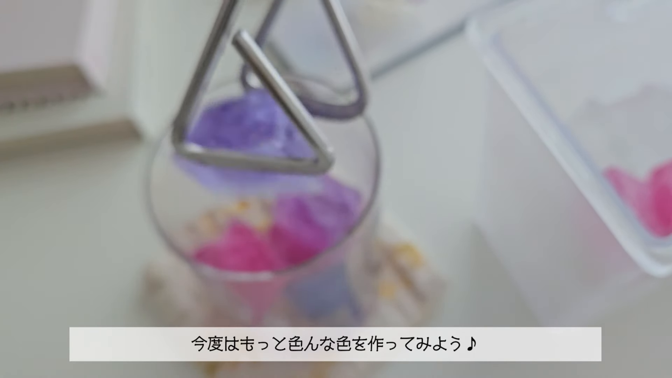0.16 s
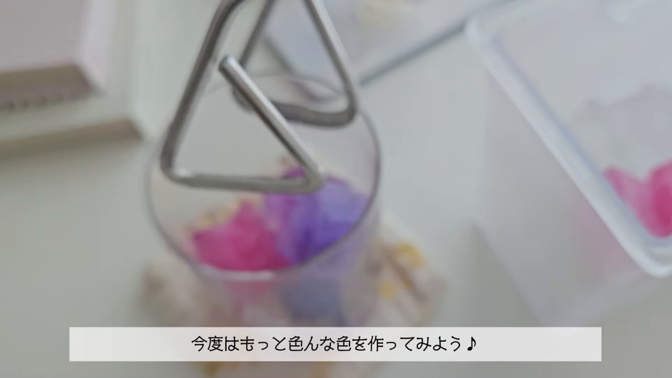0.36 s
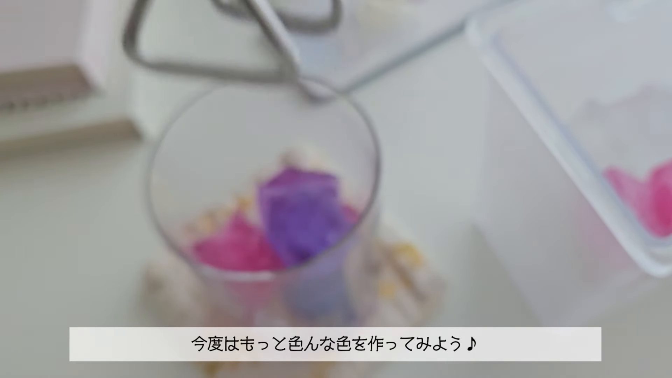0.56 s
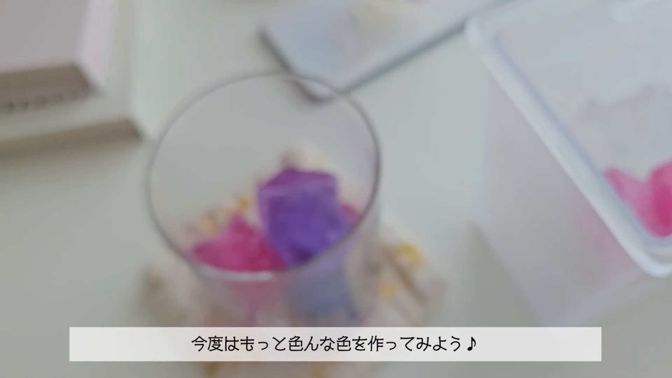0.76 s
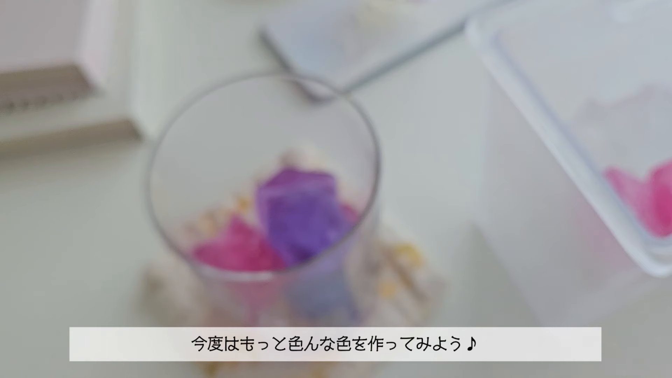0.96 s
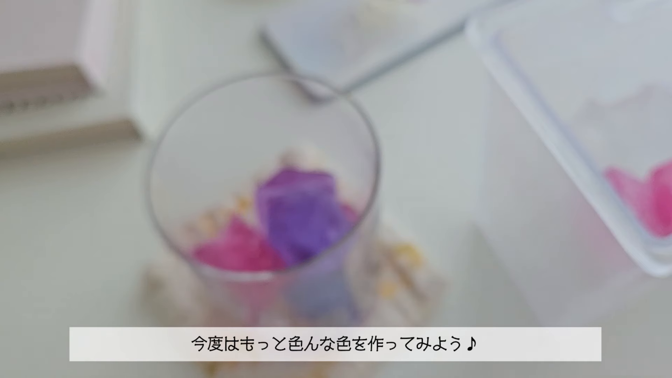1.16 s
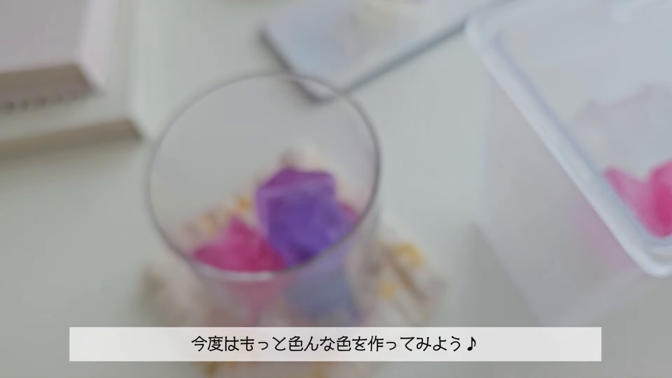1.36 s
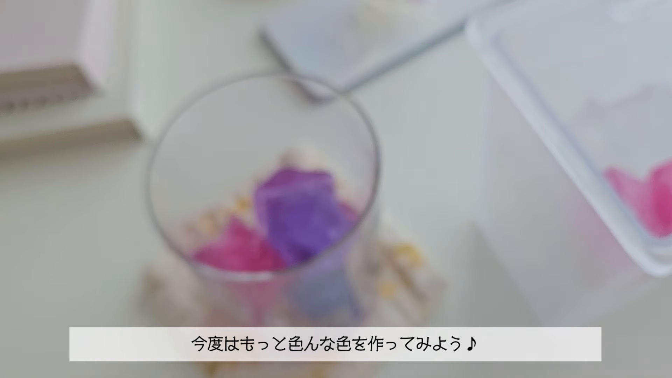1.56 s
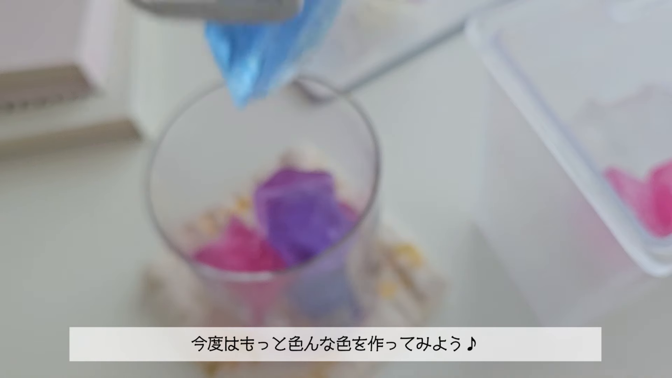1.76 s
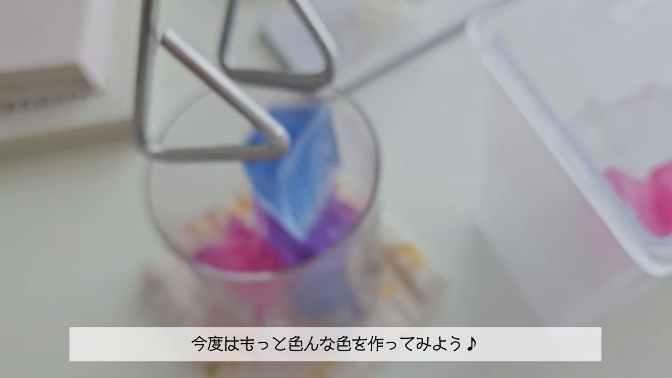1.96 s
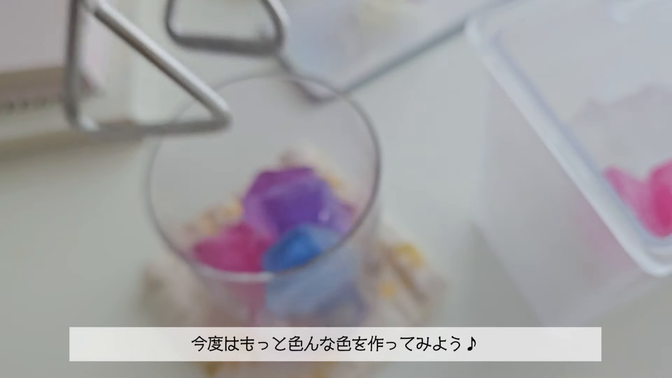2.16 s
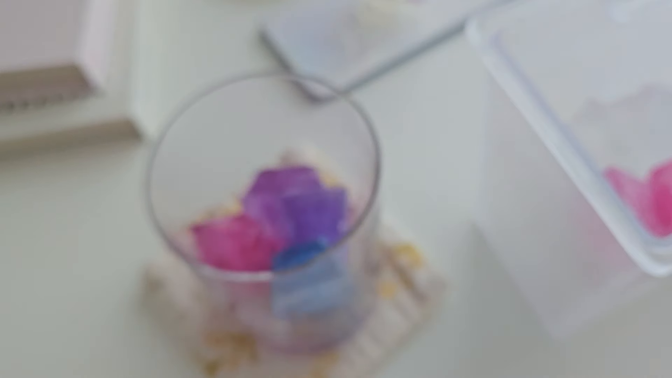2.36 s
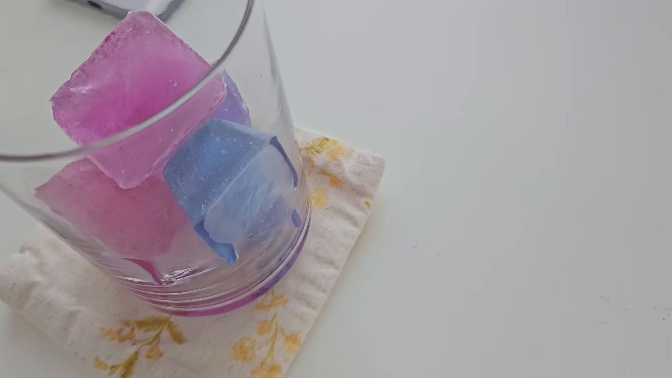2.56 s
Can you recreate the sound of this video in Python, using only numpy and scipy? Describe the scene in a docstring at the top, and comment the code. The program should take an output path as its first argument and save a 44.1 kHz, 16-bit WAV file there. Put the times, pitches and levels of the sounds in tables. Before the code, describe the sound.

Close stereo microphones in a small quiet kitchen hear an ice cube clatter brightly into a glass of ice, a pause of faint room rumble, then a second cube strike with a fuller hollow knock and settle.

```python
"""Small kitchen: two ice cubes drop from tongs into a glass that stands on a cloth coaster and already holds ice.
Each cube strikes the glass, rattles against the other cubes and settles. A contact is a noise-burst crack
of ice plus damped sines: hollow knock of the base, bright clink, ring of the wall, low thump of the table.
Runs of short noise ticks are ice edges catching. Decaying noise gives the answer of worktop and room;
filtered noise and wavering sines give the room's rumble, hiss and faint hum."""
import sys
import numpy as np
from scipy import signal
from scipy.fft import rfft, irfft, next_fast_len
from scipy.io import wavfile
from scipy.ndimage import map_coordinates

SR = 44100
rng = np.random.default_rng(int(sys.argv[2]) if len(sys.argv) > 2 else 0)


def log_audio(samples):
    """Write samples as a 16-bit WAV file to the path given in sys.argv[1]."""
    # one column per channel
    frames = np.atleast_2d(samples).T
    # limit to full scale, then quantise
    limited = np.clip(frames, -1, 1)
    pcm = np.round(limited * 32767).astype(np.int16)
    wavfile.write(sys.argv[1], SR, pcm)


N = 114660

# the two cubes, the second deeper in the ice; values between the times are interpolated:
# t/s, left minus right/dB, room tail offset/dB, table thump re knock/dB
CUBES = [(.6, -1.5, .5, -11), (1.9, 2.5, -4, -17)]
HALVES = np.array([[.5], [-.5]])  # splits a left-minus-right difference over the channels


def ice_in_glass():
    """Each contact excites crack, base, table and wall; its strike point picks one loud, quickly damped clink."""
    # contacts of the ice: t/s, crack/dB, crack corner/Hz, knock/dB, wall ring/dB, clink/dB, clink kind
    contacts = [ (.140, -62.5, 4000, -59, -83.5, -66, "hollow"), (.2443, -26, 3012, -23, -36, -9, "hollow"),
                (.2450, -18, 11000, -39.5, -25, -6.5, "bright"),
                (.2456, -16.5, 9000, -40.5, -33, -8, "clear"), (.266, -30, 7000, -44, -38, -22, "bright"),
                (.274, -32, 5135, -43, -36, -23, "hollow"), (.281, -21, 5000, -33, -23, -21, "clear"),
                (.2912, -15, 8170, -30.5, -31, -1.5, "bright"), (.302, -26, 4970, -17.5, -42, -24, "clear"),
                (.311, -20.5, 5838, -37, -39, -24, "thin"), (.320, -27, 6965, -42, -35, -17, "bright"),
                (.332, -23, 11400, -47.5, -41, -24, "icy"), (.343, -28, 5000, -49, -50, -36, "clear"),
                (.348, -24, 6130, -42.5, -48, -31, "icy"), (.387, -28, 3477, -49.5, -49, -39.5, "ping"),
                (.403, -34, 4020, -34, -58, -38, "ping"), (.430, -38, 3010, -39, -66, -43, "ping"),
                (.440, -55, 2913, -39.5, -80, -52, "bright"), (.523, -42.5, 2000, -46.5, -78, -40, "dull"),
                (.552, -54, 2480, -49, -85, -54, "dull"), (1.9884, -8, 4200, -9.5, -30, -12, "hollow"),
                (1.995, -12.5, 5500, -22.5, -24, -10.5, "clear"),
                (2.000, -23, 6050, -44, -40, -16, "bright"), (2.0592, -23, 13000, -27, -45, -32, "clear"),
                (2.089, -25, 14750, -34, -49, -36, "clear"), (2.131, -16, 5000, -18.5, -40, -25.5, "low"),
                (2.151, -25.5, 4900, -30, -56.5, -27.5, "low"), (2.177, -38, 5000, -37, -68, -34, "low"),
                (2.225, -25.5, 10800, -33, -50, -38, "bright"), (2.232, -29, 5910, -34, -57, -40, "ping"),
                (2.248, -39.5, 6000, -30.5, -67.5, -42, "low"), (2.303, -43, 5140, -43, -72, -50, "ping"),
                (2.313, -38, 3000, -30.5, -72, -31, "low")]
    # wall of the glass, ringing on: f/Hz, level/dB, t60/s
    wall_modes = [(1203, -10, .18), (2477, -4, .15), (4104, -7, .28), (8515, -1, .1), (6235, -2, .13),
                  (6420, -6, .18), (6470, -10, .25), (7330, -5, .09), (7410, -5, .13), (9440, -6, .1),
                  (11420, -15, .13), (12400, -13, .13), (13400, -15, .09)]
    # base of the glass: f/Hz, level/dB, t60/s
    base_modes = [(881.2, -4, 0.051), (1836, -8.5, 0.064), (2140, -16, 0.044)]
    # damped resonances of the loaded glass: clink kind -> f/Hz
    clink_hz = {"dull": 990, "low": 1820, "hollow": 2050, "ping": 4104, "clear": 6410, "bright": 7385,
                "thin": 8510, "icy": 9460}
    crack_t60_s, clink_t60_s = .025, .034
    out = np.zeros((2, N + SR))
    t = np.arange(SR * 2 // 3) / SR
    times, _, _, table_db = np.transpose(CUBES)
    thump = table_thump(t)
    for s, crack_db, corner_hz, knock_db, wall_db, clink_db, kind in contacts:
        ice = amp(crack_db) * crack(t, corner_hz, crack_t60_s)
        table = amp(np.interp(s, times, table_db)) * thump
        knock = amp(knock_db) * (ring(base_modes, t) + table)
        wall = amp(wall_db) * ring(wall_modes, t)
        clink = ring([(clink_hz[kind], clink_db, clink_t60_s)], t)
        place(out, s, ice + knock + wall + clink, t)
    return out[:, :N]


def crack(t, corner_hz, t60_s):
    """Ice crack: coloured noise burst; a softer contact has a lower corner and is duller."""
    # colour of an ice crack in the glass: f/Hz, level/dB
    crack_colour = [(60, -19), (300, -13.5), (600, -27), (900, -2.5), (1400, -8.5), (1900, 2.5), (2650, -5),
                    (3050, 2), (3900, 0.5), (5400, -4), (6500, -6.5), (7500, -0.5), (8100, -1), (9500, 1.5),
                    (10600, -17.5), (12300, 0), (13400, -6), (14400, -20.5), (15500, 2)]
    rise_s, apart = .0003, .22
    hz = np.fft.rfftfreq(1024, 1 / SR)
    rolloff = 1 / np.sqrt(1 + (hz / corner_hz) ** 3)
    colour = causal(amp(along(crack_colour, hz)) * rolloff)
    burst = two_noises(t, apart) * fade(t, t60_s) * (1 - np.exp(-t / rise_s))
    return 2 * signal.fftconvolve(burst, colour[None], axes=1)[:, :len(t)]


def ring(modes, t):
    """Damped sine modes; the shifting ice changes their pitch and strength a little at every blow."""
    detune, scatter_db, rise_s = .0018, 2, .00043  # detune: relative standard deviation
    hz, db, t60_s = np.transpose(modes)
    hz = hz * (1 + detune * rng.standard_normal(len(hz)))
    gain = amp(db + scatter_db * rng.standard_normal(len(hz)))
    sines = np.sin(2 * np.pi * hz[:, None] * t) * fade(t, t60_s[:, None])
    return gain @ sines * (1 - np.exp(-t / rise_s))


def table_thump(t):
    """Table answers a knock: one low damped sine with a slow rise."""
    f_hz, rise_s, t60_s = 77, .04, .2
    return np.sin(2 * np.pi * f_hz * t) * fade(t, t60_s) * (1 - np.exp(-t / rise_s))


def rattle():
    """First cube jostles down; ice edges catch in runs of tiny, uneven ticks."""
    # tick runs: start/s, length/s, crack/dB
    tick_runs = [(.254, .11, -20), (.36, .07, -35)]
    ticks_per_s, t60_s, scatter_db, corner_hz = 90, .005, 4, 4500
    out = np.zeros((2, N + SR))
    t = np.arange(SR // 2) / SR
    brief = t[:1024]
    for start_s, length_s, db in tick_runs:
        run = np.zeros((2, len(t)))
        for k in range(int(length_s * ticks_per_s)):
            gain = amp(db + scatter_db * rng.standard_normal())
            tick_s = (k + rng.random()) / ticks_per_s
            run[:, round(tick_s * SR):][:, :len(brief)] += gain * crack(brief, corner_hz, t60_s)
        place(out, start_s, run, t)
    return out[:, :N]


def place(out, s, x, t):
    """Adds a sound at its time, on its cube's side, with the room's answer."""
    times, lean_db, room_db, _ = np.transpose(CUBES)
    heard = kitchen(x, t, np.interp(s, times, room_db))
    out[:, round(s * SR):][:, :len(t)] += heard * amp(np.interp(s, times, lean_db) * HALVES)


def kitchen(x, t, room_db):
    """Direct sound, quick answer of the worktop, and room tail whose decay depends on frequency."""
    # decay of the room tail: f/Hz, t60/s
    tail_t60 = [(150, 0.51), (900, 0.4), (2000, 0.33), (4000, .36), (6500, 0.35), (8500, 0.37),
                (10000, 0.29), (15000, 0.2)]
    tail_db, tail_rise_s, tail_left_minus_right_db = -13.5, .006, .5
    early_db, early_t60_s = -6, .075
    apart = .8
    hz, s, z = signal.stft(two_noises(t, apart), SR, nperseg=256)
    z = z * fade(s, along(tail_t60, hz)[:, None])
    tail = signal.istft(z, SR, nperseg=256)[1][:, :len(t)]
    tail = unit(tail * (1 - np.exp(-(t / tail_rise_s) ** 2)))
    tail = tail * amp(tail_db + room_db + tail_left_minus_right_db * HALVES)
    early = unit(two_noises(t, apart) * fade(t, early_t60_s)) * amp(early_db)
    response = (tail + early) / np.sqrt(len(t))
    return x + signal.fftconvolve(x, response, axes=1)[:, :len(t)]


def background():
    """Room rumble and hiss from filtered noise, nearly mono in the bass, plus faint wavering hum sines."""
    # spectrum shape of the room noise: f/Hz, relative density/dB
    air_shape = [(22, -8.5), (45, -3), (75, -13.5), (125, -21.5), (165, -17.5), (230, -21.5), (275, -14.5),
                 (380, -24), (600, -36.5), (870, -33.5), (1600, -44.5), (3100, -43), (5000, -48.5),
                 (7000, -58.5), (16000, -62)]
    # stereo width of the room noise: f/Hz, side minus mid/dB
    air_width = [(60, -21), (150, -15), (400, -5.5), (2000, 1.5), (8000, -5)]
    # hum: f/Hz, rms before waver/dB
    hum_lines = [(160, -79.5), (272, -71)]
    air_rms_db = -59
    waver = .6  # relative for level, rad for phase

    def mid_side_gain(hz):
        return amp(along(air_shape, hz) + np.outer([0, 1], along(air_width, hz)))

    mid, side = filtered(rng.standard_normal((2, N)), mid_side_gain)
    air = unit(np.array([mid + side, mid - side])) * amp(air_rms_db)
    t = np.arange(N) / SR
    hum = np.zeros(N)
    for hz, db in hum_lines:
        level = amp(db) * np.sqrt(2) * (1 + waver * wobble(4.3))
        hum += level * np.sin(2 * np.pi * hz * t + waver * wobble(15.0))
    return air + hum


def two_noises(t, apart):
    """Noise at two microphones; the power share apart is unrelated between them."""
    noise = rng.standard_normal((3, len(t)))
    return np.sqrt(1 - apart) * noise[0] + np.sqrt(apart) * noise[1:]


def amp(db):
    """Decibels to gain."""
    return 10 ** (np.asarray(db) / 20)


def unit(x):
    """Scaled to rms 1."""
    return x / np.sqrt(np.mean(x ** 2) + 1e-20)


def along(points, hz):
    """Interpolates (f/Hz, value) points on a log frequency axis."""
    f, v = np.transpose(points)
    return np.interp(np.log(hz + 1), np.log(f + 1), v)


def fade(t, t60_s):
    """Exponential decay, -60 dB at t60_s."""
    return np.exp(-np.log(1000) * t / t60_s)


def wobble(knots_per_s):
    """Smooth random curve."""
    return map_coordinates(rng.standard_normal(256), [np.arange(N) * knots_per_s / SR], mode="wrap")


def filtered(x, response):
    """x through a complex response of frequency."""
    m = next_fast_len(N + SR // 2)
    return irfft(rfft(x, m) * response(np.fft.rfftfreq(m, 1 / SR)), m)[..., :N]


def causal(gain):
    """Minimum-phase impulse response of this gain, from the folded cepstrum."""
    c = irfft(np.log(np.maximum(gain, 1e-6)))
    half = len(c) // 2
    c[1:half] *= 2
    c[half + 1:] = 0
    return irfft(np.exp(rfft(c)))


def scene():
    """Glass over background; the glass reaches the left microphone a little before the right one."""
    # balance of the glass: f/Hz, left minus right/dB
    pan = [(200, -1.5), (870, 2.5), (1200, -3), (1900, -1), (2500, 3), (4100, -2), (6000, 0), (7500, -1),
           (8600, 2), (12000, -1)]
    lead_s = .000162

    def to_microphones(hz):
        return amp(HALVES * along(pan, hz)) * np.exp(2j * np.pi * HALVES * hz * lead_s)

    glass = ice_in_glass() + rattle()
    return background() + filtered(glass, to_microphones)


def record(dry):
    """Recorder: clips at full scale, then a very steep low-pass sets the band limit."""
    top_hz = 15900
    return filtered(np.clip(dry, -1, 1), lambda hz: 1 / np.sqrt(1 + (hz / top_hz) ** 160))


dry = scene()
out = record(dry)
log_audio(out)
```